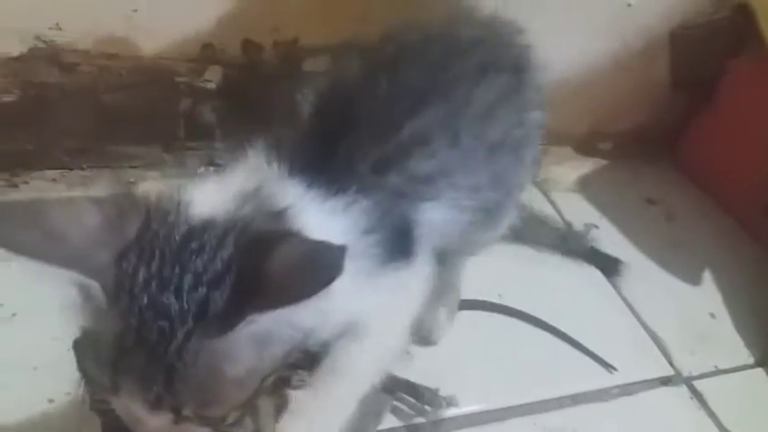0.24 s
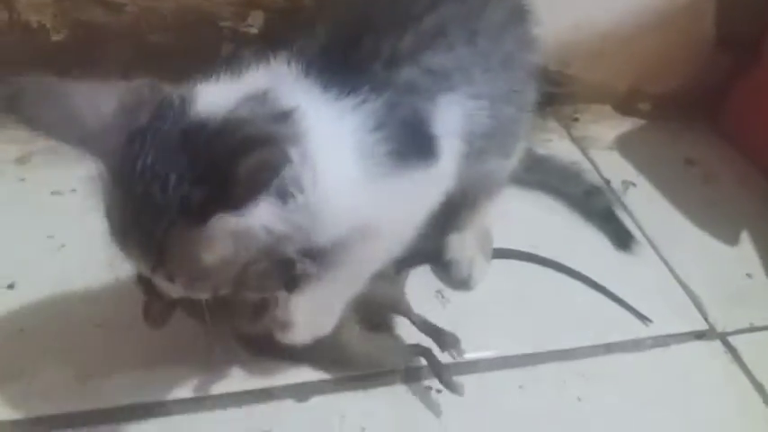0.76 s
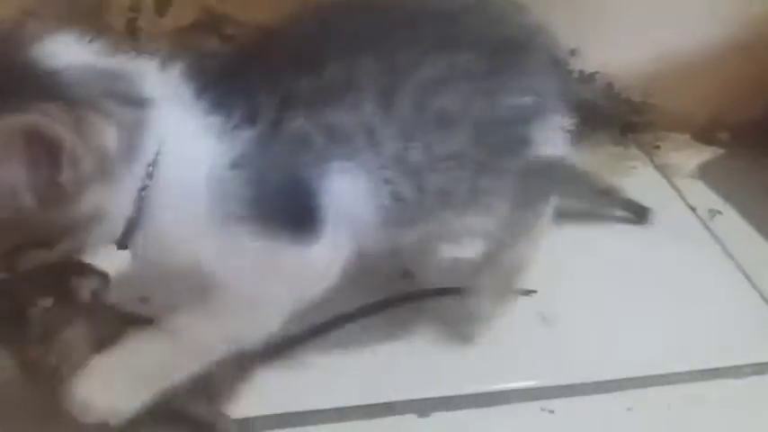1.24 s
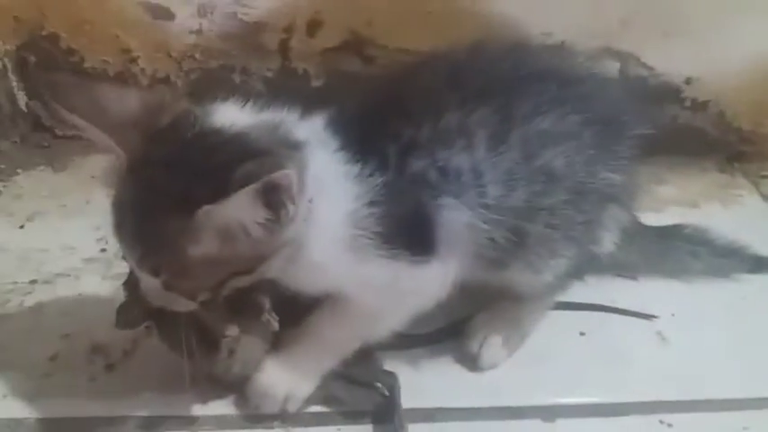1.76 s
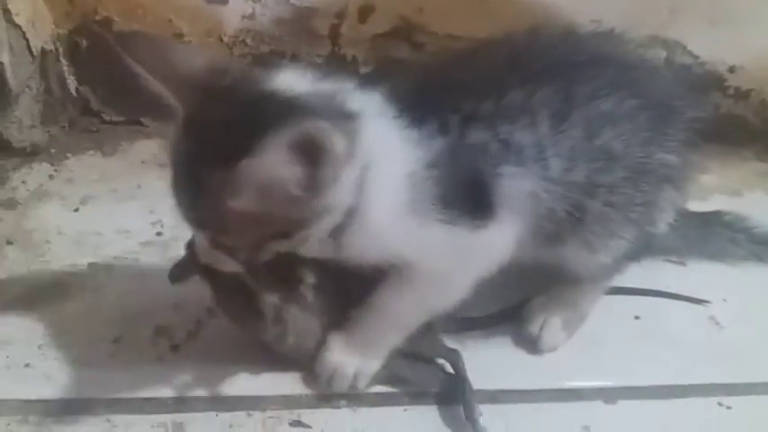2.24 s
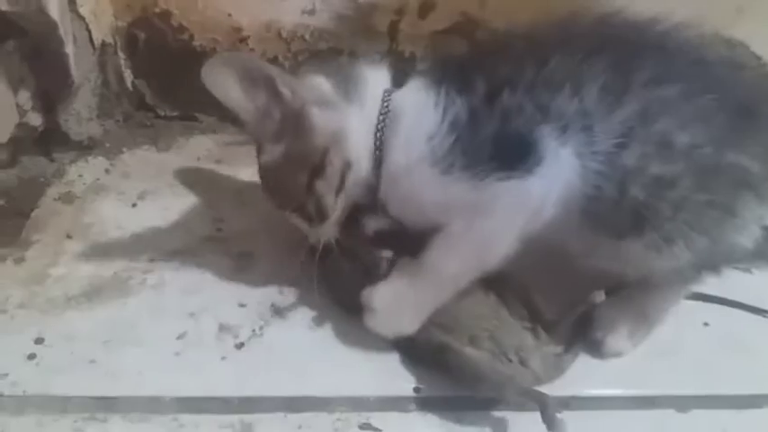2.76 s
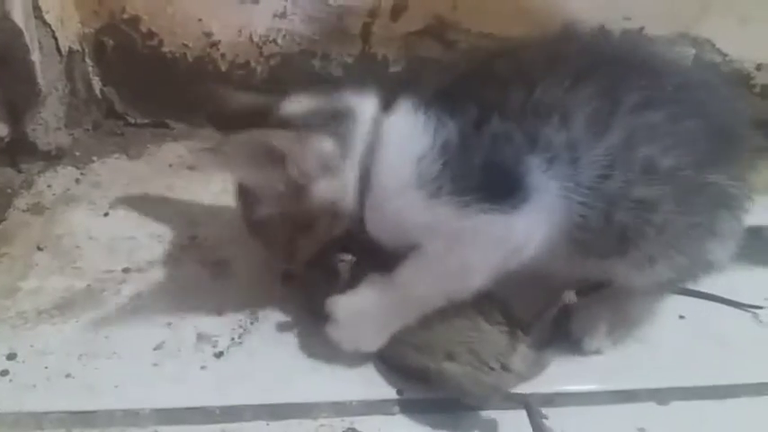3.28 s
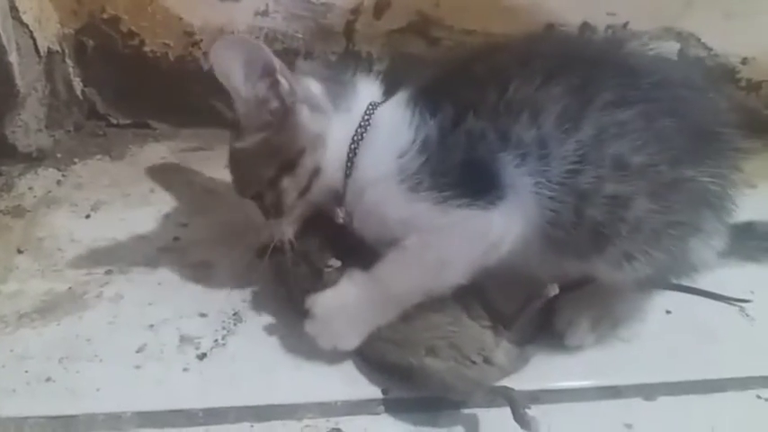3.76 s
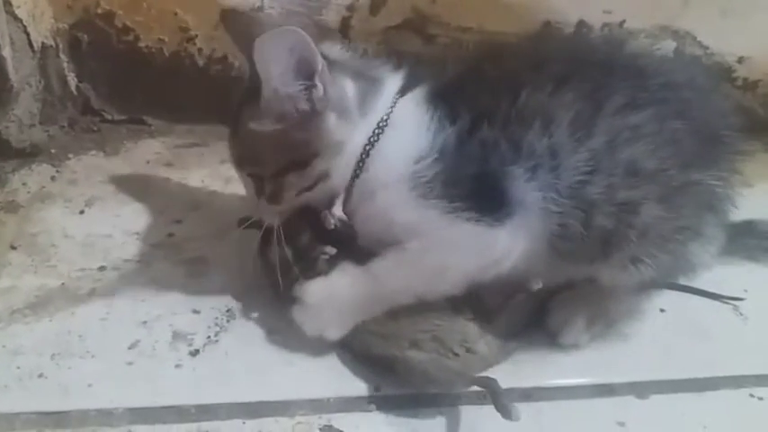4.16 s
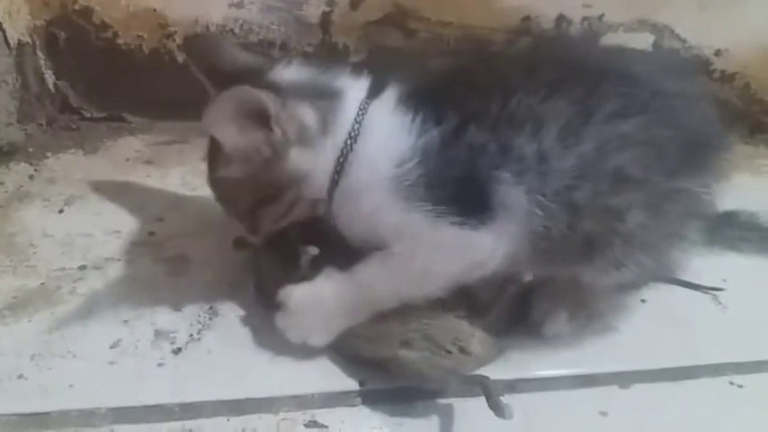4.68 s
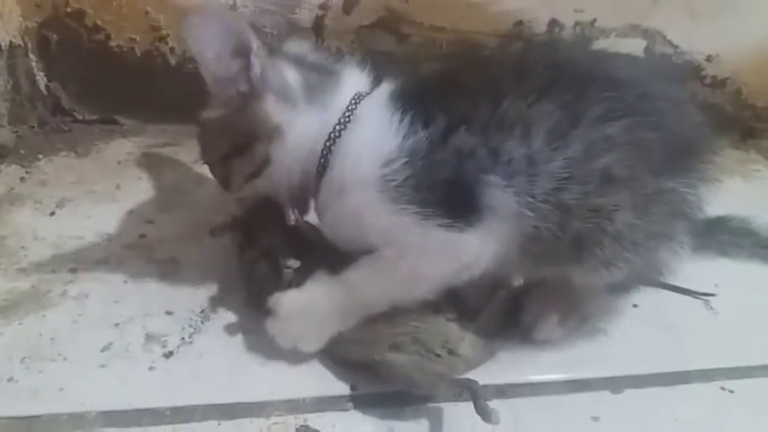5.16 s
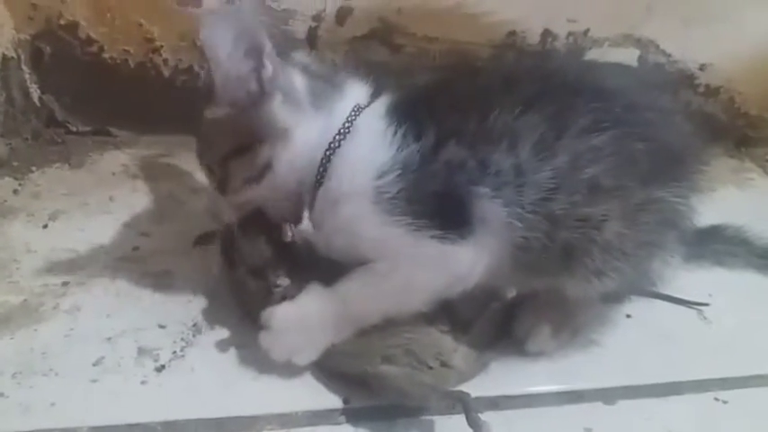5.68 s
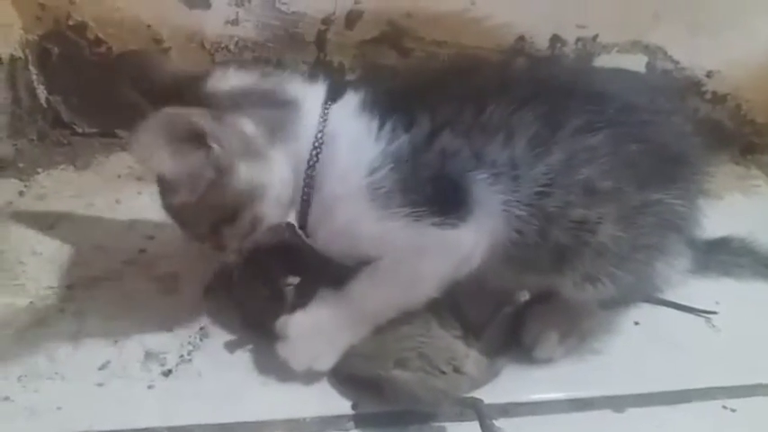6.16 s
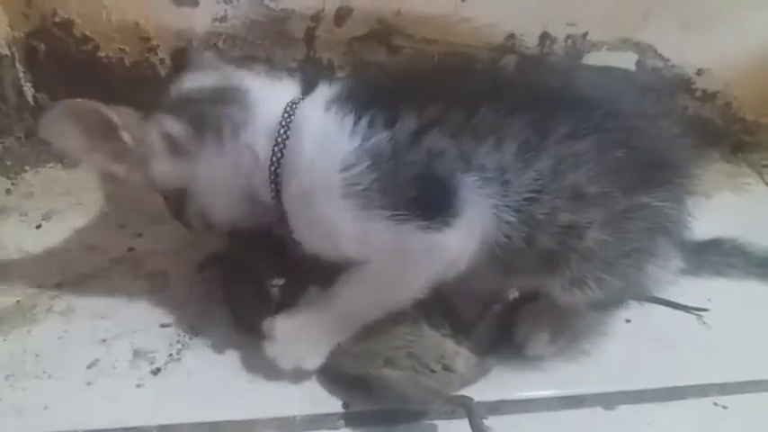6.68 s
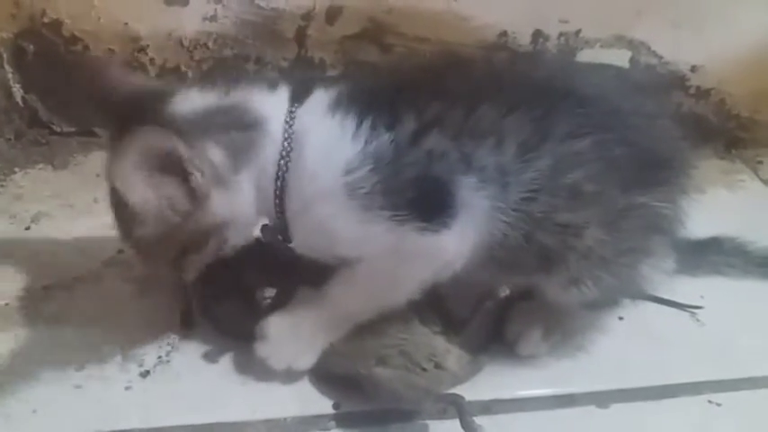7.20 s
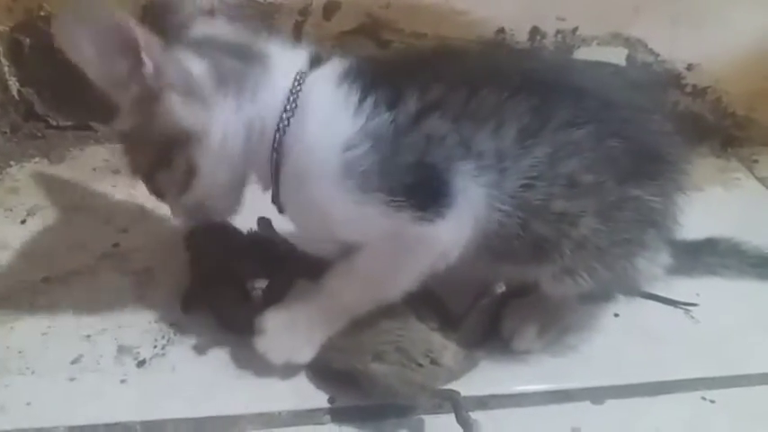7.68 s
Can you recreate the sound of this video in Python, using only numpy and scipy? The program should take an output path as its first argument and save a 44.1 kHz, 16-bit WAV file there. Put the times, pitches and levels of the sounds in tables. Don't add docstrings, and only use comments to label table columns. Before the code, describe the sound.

A kitten clutching prey gives three short, low, rattling growls close up, with tooth cracks and claw clicks between, over faint cricket trills and room hiss.

```python
import sys
import numpy as np
from scipy import signal
from scipy.io import wavfile
from scipy.ndimage import uniform_filter1d

SR = 44100
rng = np.random.default_rng(int(sys.argv[2]) if len(sys.argv) > 2 else 0)


def dump(signal):
    limited = np.clip(np.atleast_2d(signal).T, -1, 1)
    pcm = np.round(limited * 32767).astype(np.int16)
    wavfile.write(sys.argv[1], SR, pcm)


def convert_level_to_amplitude(level_db):
    exponent = np.asarray(level_db, float) / 20
    return 10 ** exponent


N = 350154


def rms_one(x):
    return x / np.sqrt(np.mean(x ** 2) + 1e-20)


def resonance(x, hz, width_hz):
    r = np.exp(-np.pi * width_hz / SR)
    top = np.array([1, 0, -1]) * (1 - r * r) / 2
    return signal.lfilter(top, [1, -2 * r * np.cos(2 * np.pi * hz / SR), r * r], x)


def double_resonance(x, hz, width_hz):
    return resonance(resonance(x, hz, width_hz), hz, width_hz)


def band(x, low_hz, high_hz):
    return signal.sosfilt(signal.butter(2, [low_hz, high_hz], "band", fs=SR, output="sos"), x)


def drift(rate_hz):
    r = np.exp(-2 * np.pi * rate_hz / SR)
    wander = signal.lfilter([1], [1, -2 * r, r * r], rng.standard_normal(N + SR))
    return rms_one(wander[SR:])


# time_s, throat_db, pulse_rate_hz, nose_db (above the throat)
GROWL_1 = [
    (0.0, -40, 122.6, -10.5),
    (0.103, -39.5, 123.5, -10.5),
    (0.232, -39.5, 131.4, -8.5),
    (0.365, -40.5, 135.6, -7.5),
    (0.435, -41.5, 113.8, -5),
    (0.507, -41.5, 108.9, -3.5),
    (0.54, -41, 104.7, -4.5),
    (0.58, -43.5, 91, -10.5),
]
GROWL_2 = [
    (1.493, -46.5, 133.3, -20),
    (1.633, -39.5, 131.9, -12.5),
    (1.71, -39.5, 135.5, -9),
    (1.76, -39.5, 122.1, -11),
    (1.862, -38.5, 121.6, -10.5),
    (2.075, -39.5, 127.8, -9),
    (2.243, -39, 130.9, -7),
    (2.3, -37, 131.1, -7),
    (2.431, -39.5, 129.3, -11),
]
GROWL_3 = [
    (4.192, -40, 129.2, -23),
    (4.24, -38, 130, -27),
    (4.256, -37, 165.8, -22),
    (4.302, -37.5, 203, -23),
    (4.318, -37, 180.2, -22),
    (4.342, -36.5, 219.8, -22),
    (4.405, -39, 140.2, -22),
    (4.49, -39, 154.8, -21),
    (4.664, -35.5, 118.2, -18.5),
]
# start_hz, end_hz
THROAT_GLIDES = [
    (284, 308),
    (340, 369),
    (365, 383),
]
# throat_width_hz, nose_hz, nose_width_hz, upper_hz, upper_db, pulse_rise_s, breath_db
MOUTHS = [
    (130, 818, 110, 1220, -17, 0.00039, -27.5),
    (193, 770, 320, 810, -5, 0.00095, -32),
    (193, 620, 120, 1410, -3, 0.0017, -30.5),
]
# nose_phase_rad, period_jitter (0-1), shimmer_db
LARYNXES = [
    (3.4, .038, 1.2),
    (.45, .057, 1.0),
    (.5, .052, 1.7),
]
REST_RATE_HZ, THROAT_PER_RATE = 145, 0.43


def growl(course, throat_ends, mouth, larynx):
    s, throat_db, rate, nose_db = np.transpose(course)
    throat_width, nose_hz, nose_width, upper_hz, upper_db, rise_s, breath_db = mouth
    nose_phase, jitter, shimmer_db = larynx
    throat_hz = np.interp(s, s[[0, -1]], throat_ends) + THROAT_PER_RATE * (rate - REST_RATE_HZ)

    t = np.arange(s[0], s[-1], 1 / SR)
    cycles = np.cumsum(np.interp(t, s, rate)) / SR
    count = int(cycles[-1]) + 1
    chance = rng.standard_normal((200, 4))
    alternation = (-1) ** np.arange(count) * 0.5
    waver = signal.lfilter([.7], [1, -.75], chance[:count, 2])
    slip = jitter * (chance[:count, 0] + alternation + waver)
    pulse_times = np.interp(np.arange(count) + slip, cycles, t)

    age = np.arange(1200) / SR
    rise = 1 - np.exp(-age / rise_s)
    throat_decay, nose_decay = np.exp(-np.pi * throat_width * age), np.exp(-np.pi * nose_width * age)
    nose_ring = np.sin(2 * np.pi * nose_hz * age + nose_phase)
    nose_ring += convert_level_to_amplitude(upper_db) * np.sin(2 * np.pi * upper_hz * age)
    throat, nose = np.zeros((2, N + len(age)))
    for when, (_, size, tune, nose_open) in zip(pulse_times, chance):
        i = int(when * SR)
        pulse = convert_level_to_amplitude(shimmer_db * size) * rise
        hz = np.interp(when, s, throat_hz) * (1 + .012 * tune)
        throat[i:i + len(age)] += pulse * throat_decay * np.sin(2 * np.pi * hz * age)
        nose[i:i + len(age)] += pulse * convert_level_to_amplitude(0.54 * nose_open) * nose_decay * nose_ring

    clock = np.arange(N) / SR
    inside = slice(int(s[0] * SR), int(s[-1] * SR))
    nose_level_db = np.interp(clock, s, nose_db)
    throat = throat[:N] / np.std(throat[inside])
    nose = nose[:N] / np.std(nose[inside]) * convert_level_to_amplitude(nose_level_db)

    blowing = uniform_filter1d(((clock > s[0]) & (clock < s[-1])) * 1., size=2000)
    airflow = blowing * convert_level_to_amplitude((nose_level_db - np.median(nose_db)) / 2)
    air = rng.standard_normal(N)
    hiss = band(air, 1800, 17000) + convert_level_to_amplitude(16.0) * band(air, 520, 2530)
    breath = convert_level_to_amplitude(breath_db) * airflow * hiss
    return convert_level_to_amplitude(np.interp(clock, s, throat_db)) * (throat + nose + breath)


# pause_s (middle of the pause), phrase_db (phrase that follows)
CRICKET = [(-.1, -56), (0.178, -59.5), (0.535, -61.5), (0.824, -62.5), (1.112, -62), (1.442, -61.5),
           (1.734, -62.5), (2.105, -59.5), (2.437, -62.5), (2.774, -64.5), (3.09, -63.5), (3.463, -64),
           (3.806, -63.5), (4.137, -62.5), (4.507, -61.5), (4.768, -62.5), (5.112, -62), (5.376, -64),
           (5.716, -67), (5.96, -62), (6.287, -63.5), (6.628, -64.5), (6.97, -63.5), (7.334, -62),
           (7.706, -63.5)]
CRICKET_HZ, STROKES_PER_S, CRICKET_PAUSE_S = 4512, 64, .07
RASP_HZ, RASP_WIDTH_HZ, RASP_DB = 4350, 340, -9.5


def cricket():
    t = np.arange(N) / SR
    pause, phrase_db = np.transpose(CRICKET)
    phrase = np.searchsorted(pause, t) - 1
    along = t - pause[phrase]
    to_next = np.append(pause[1:], 9)[phrase] - t
    from_pause = np.minimum(along, to_next) - CRICKET_PAUSE_S / 2
    gate = np.clip(from_pause / 0.009 + .5, .05, 1)
    stroke = np.cumsum(STROKES_PER_S * (1 + 0.0566 * drift(4.02))) / SR
    beat = (1 + .55 * np.sin(2 * np.pi * stroke)) * convert_level_to_amplitude(2.2 * drift(70))
    pitch_hz = CRICKET_HZ - 80 * (along - .17) + 38 * drift(150)
    tone = np.sin(2 * np.pi * np.cumsum(pitch_hz) / SR)
    rasp = rms_one(double_resonance(rng.standard_normal(N), RASP_HZ, RASP_WIDTH_HZ))
    return convert_level_to_amplitude(phrase_db[phrase]) * gate * rms_one(beat * (tone + convert_level_to_amplitude(RASP_DB) * rasp))


WHINE_HZ, WHINE_DB = 8365, -78.5


def whine():
    tone = np.sin(2 * np.pi * np.cumsum(WHINE_HZ + 22 * drift(30)) / SR)
    return convert_level_to_amplitude(WHINE_DB + 1.7 * drift(58)) * rms_one(tone)


# pitch_hz, level_db (per Hz)
AIR = [(25, -16), (60, -6), (150, -3.5), (400, -8.5), (1000, -12), (2500, -19), (5000, -27), (7200, -41.5),
       (7800, -41), (10000, -33.5), (15500, -32.5)]
AIR_DB = -56


def room_air():
    edges = 22 * 2 ** np.arange(0, 9.7, 1 / 3)
    white = rng.standard_normal((2, N))
    hz, db = np.transpose(AIR)
    air = np.zeros(N)
    for k, (low, high) in enumerate(zip(edges, edges[1:])):
        band_db = np.interp(np.log(low * high) / 2, np.log(hz), db)
        air += convert_level_to_amplitude(band_db) * band(white[k % 2], low, high)
    return convert_level_to_amplitude(AIR_DB + 1.16 * drift(18)) * rms_one(air)


# pitch_hz, width_hz, level_db, flutter_db
STEADY = [
    (291.5, 14.3, -66, -0.7),
    (4330, 400, -69.5, 3),
    (4720, 190, -71.5, 4),
    (6554, 520, -75.5, 4.2),
    (7080, 270, -86.5, -6.5),
]
FLUTTER_TOP_DB = 1.1


def fan_and_chorus():
    out = np.zeros(N)
    for hz, width_hz, db, flutter_db in STEADY:
        narrow = double_resonance(rng.standard_normal(N), hz, 1.36 * width_hz)
        out += convert_level_to_amplitude(db + min(flutter_db, FLUTTER_TOP_DB) * drift(2.4)) * rms_one(narrow)
    return out


# peak_s, peak_db, half_length_s
SWELLS = [
    (0.298, -70, 0.23),
    (1.95, -64, 0.67),
    (3.932, -57.5, 0.14),
    (5.947, -58.5, 0.053),
    (7.747, -60.5, 0.081),
]
RUMBLE_DB, RUMBLE_WANDER_DB = -69.5, 4.5


def rumble():
    t = np.arange(N) / SR
    gain = convert_level_to_amplitude(RUMBLE_DB + RUMBLE_WANDER_DB * drift(2.5))
    for s, db, half_s in SWELLS:
        gain += convert_level_to_amplitude(db) * np.exp(-((t - s) / half_s) ** 2)
    return gain * rms_one(band(rng.standard_normal(N), 91.3, 131))


# start_s, peak_db, knock_hz, crack_db, snap_db
BITES = [(3.353, -27.5, 1210, -8, -23), (3.358, -37, 1760, -17, -22), (3.362, -45, 1700, -9, -9),
         (3.37, -49, 600, -10, -9), (4.737, -42, 840, -22, -20), (4.98, -26.5, 720, -6, -30),
         (4.989, -29.5, 1510, -21, -30), (5.011, -36, 930, -1.5, -7), (6.808, -38.5, 721, -6, -27),
         (6.841, -31.5, 1530, -15, -13), (6.881, -30, 890, -10, -33), (6.887, -40, 1150, -6, -33),
         (6.894, -37, 1250, -4, -33), (7.375, -29.5, 840, -12, -30), (7.396, -40, 1440, -3, -5)]
# start_s, peak_db, knock_hz, crack_db, snap_db
CLAWS = [(2.714, -42.5, 929, -1.5, -4), (3.373, -33, 1970, 1, -4), (3.38, -35, 1500, -4, -15),
         (3.3822, -25, 1190, -1, -32), (3.522, -46, 2900, -2, -20), (3.535, -45, 1300, -10, -8),
         (3.531, -31, 1470, -1.5, -6), (4.949, -39.5, 700, -1, -23), (4.957, -41, 783, 2.5, -5),
         (4.96, -46, 800, 7, -25), (4.967, -50, 880, 2, -22), (4.9805, -30, 886, -3, -35),
         (5.499, -38.5, 1700, -18, -24), (5.985, -37.5, 910, -14, -28), (6.061, -39, 900, -21, -22)]
BITE_CRACK_HZ, CLAW_CRACK_HZ = 2450, 4250
KNOCK_T60_S, CRACK_T60_S, SNAP_T60_S = 0.011, 0.009, 0.005
CLICK_LAG_S = .0004
STRIKE = 3.5


def clicks(events, crack_hz):
    out, age = np.zeros(N + 2000), np.arange(2000) / SR
    t60 = np.array([[KNOCK_T60_S], [CRACK_T60_S], [SNAP_T60_S]])
    for s, peak_db, hz, crack_db, snap_db in events:
        grit = rng.standard_normal((3, len(age))) * convert_level_to_amplitude(-60 * age / t60)
        grit *= np.minimum(age / .0007, 1)
        grit[:2, 15] -= STRIKE
        knock = resonance(band(grit[0], 0.27 * hz, 3.6 * hz), hz, 0.77 * hz)
        crack = resonance(grit[1], crack_hz, 0.59 * crack_hz)
        crack = resonance(crack, crack_hz, 0.57 * crack_hz)
        snap = band(grit[2], 7500, 16200)
        knock_db = -3.0 - 2.4 * max(crack_db + 2.5, 0)
        click = np.zeros(len(age))
        for db, part in ((knock_db, knock), (crack_db, crack), (snap_db, snap)):
            click += convert_level_to_amplitude(db) * part / abs(part).max()
        out[int((s + CLICK_LAG_S) * SR):][:len(age)] += convert_level_to_amplitude(peak_db) * click
    return out[:N]


# start_s, peak_db, pitch_hz, ring_out_s
TAPS = [
    (2.992, -47, 1240, 0.026),
    (3.692, -36.5, 1350, 0.023),
    (6.06, -27.5, 705, 0.01),
    (6.883, -44, 966, 0.06),
]
# start_s, peak_db, pitch_hz, ring_out_s
TICKS = [
    (2.7144, -55, 8390, 0.006),
    (3.3537, -34, 8770, 0.0053),
    (5.2844, -38, 8550, 0.0065),
    (6.6782, -42, 8600, 0.006),
]


def taps():
    out, age = np.zeros(N), np.arange(4000) / SR
    for s, peak_db, hz, t60_s in TAPS + TICKS:
        envelope = convert_level_to_amplitude(peak_db - 60 * age / t60_s) * np.minimum(age / 0.0023, 1)
        out[int(s * SR):][:len(age)] += envelope * np.sin(2 * np.pi * hz * age)
    return out


ROOM_T60_S, VOICE_ROOM_DB, CLICK_ROOM_DB = 0.15, -24, -15.5


def room(x):
    age = np.arange(SR // 3) / SR
    tail = band(rng.standard_normal(len(age)), 110, 9000)
    tail *= convert_level_to_amplitude(-60 * age / ROOM_T60_S) * (age > .003)
    return signal.fftconvolve(x, tail / np.sqrt(np.sum(tail ** 2)))[:N]


MIC_LOW_HZ = 176


def scene():
    voice = np.zeros(N)
    for call in zip((GROWL_1, GROWL_2, GROWL_3), THROAT_GLIDES, MOUTHS, LARYNXES):
        voice += growl(*call)
    voice = signal.sosfilt(signal.butter(3, MIC_LOW_HZ, "high", fs=SR, output="sos"), voice)
    night = cricket() + whine() + room_air() + fan_and_chorus() + rumble()
    contacts = clicks(BITES, BITE_CRACK_HZ) + clicks(CLAWS, CLAW_CRACK_HZ) + taps()
    echoes = room(convert_level_to_amplitude(VOICE_ROOM_DB) * voice + convert_level_to_amplitude(CLICK_ROOM_DB) * contacts)
    return (voice + contacts + echoes + night)[None]


def band_limit(x):
    return signal.sosfilt(signal.butter(12, 16360, fs=SR, output="sos"), x)


CUTOFF_HZ, OFFSET = 15550, -0.00097


def record(dry):
    low_pass = signal.ellip(10, .5, 30, CUTOFF_HZ, fs=SR, output="sos")
    mix = signal.sosfilt(low_pass, dry) + OFFSET
    return band_limit(mix)


dry = scene()
out = record(dry)
dump(out)
```